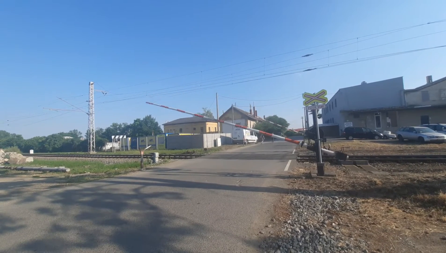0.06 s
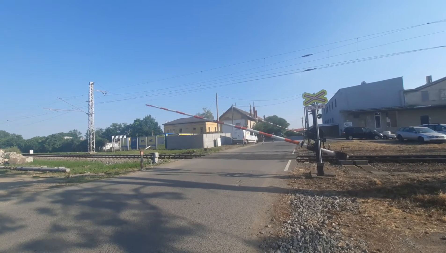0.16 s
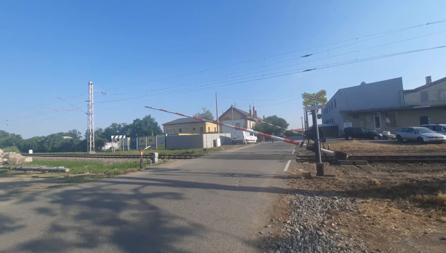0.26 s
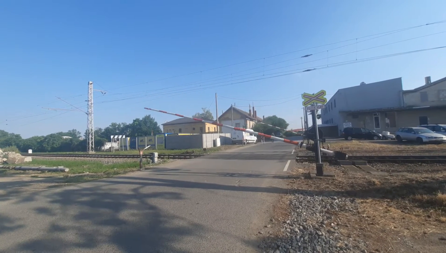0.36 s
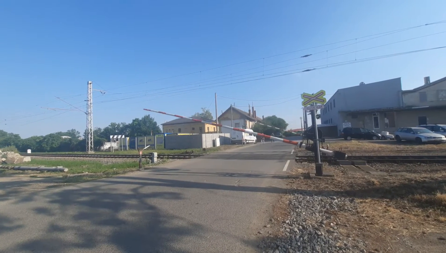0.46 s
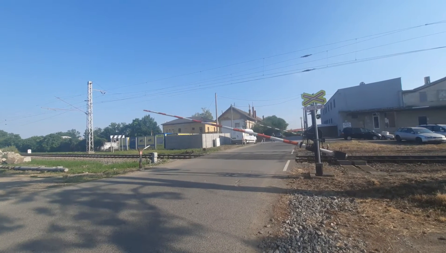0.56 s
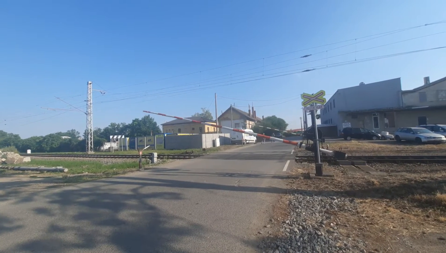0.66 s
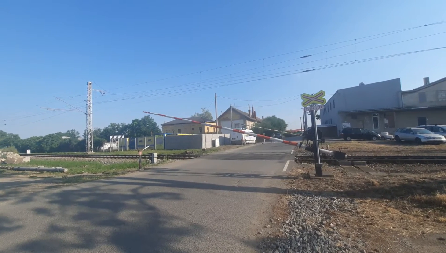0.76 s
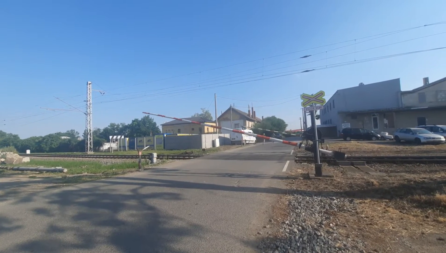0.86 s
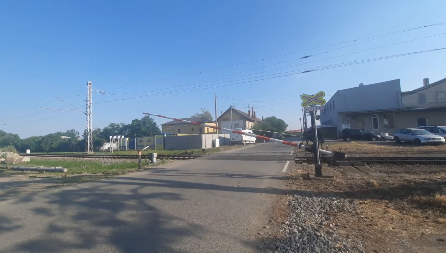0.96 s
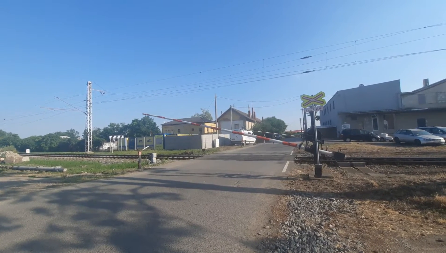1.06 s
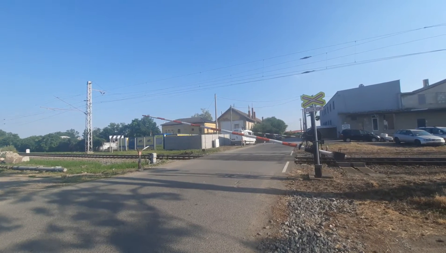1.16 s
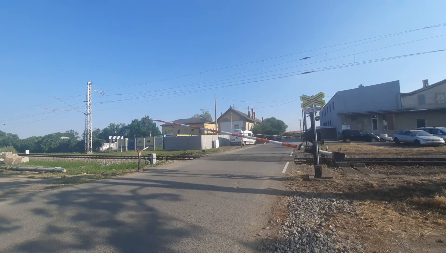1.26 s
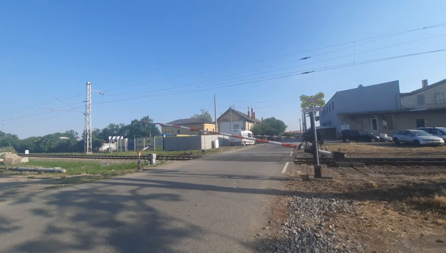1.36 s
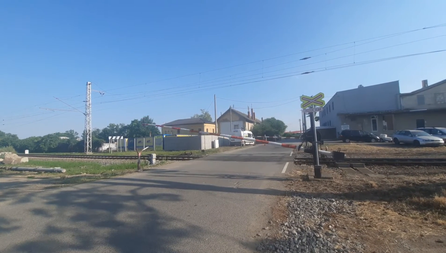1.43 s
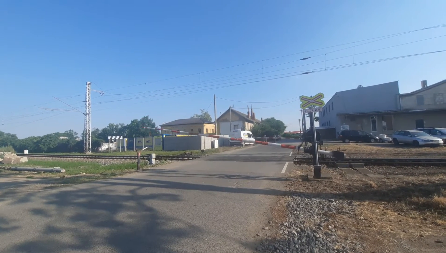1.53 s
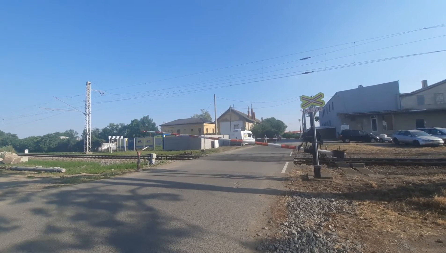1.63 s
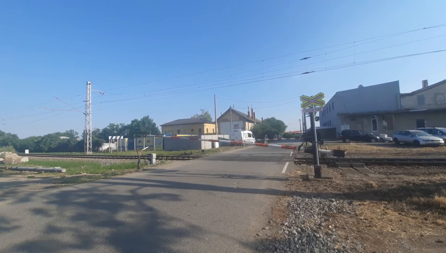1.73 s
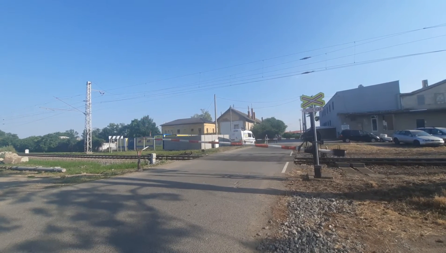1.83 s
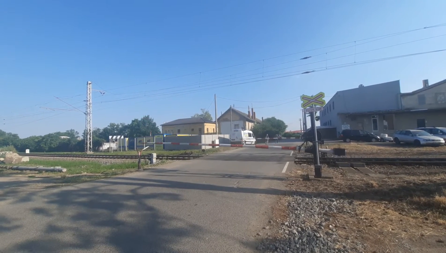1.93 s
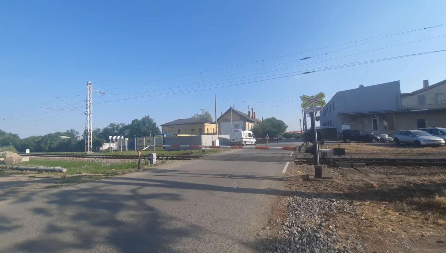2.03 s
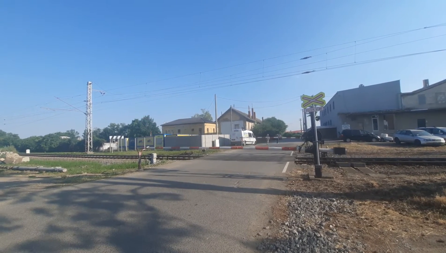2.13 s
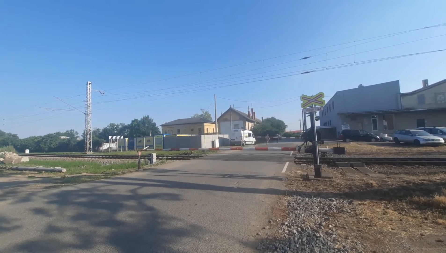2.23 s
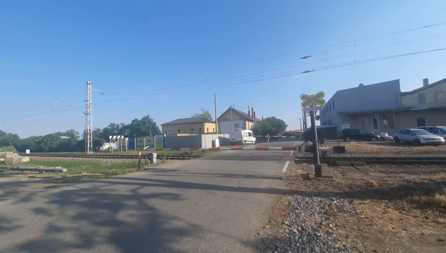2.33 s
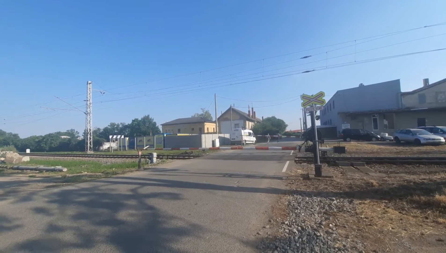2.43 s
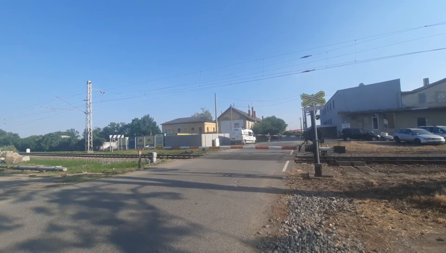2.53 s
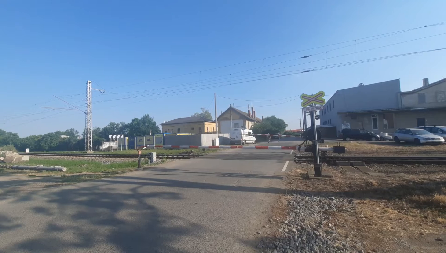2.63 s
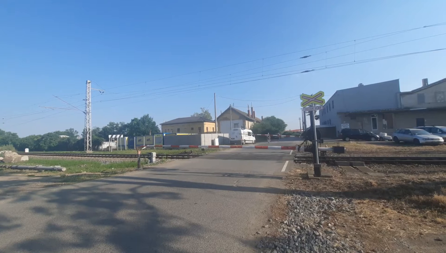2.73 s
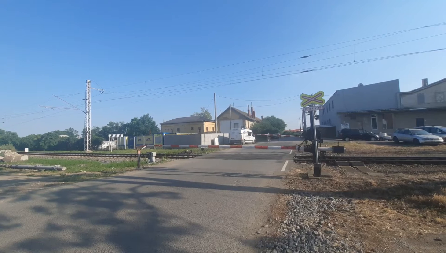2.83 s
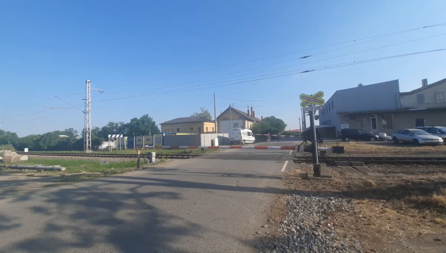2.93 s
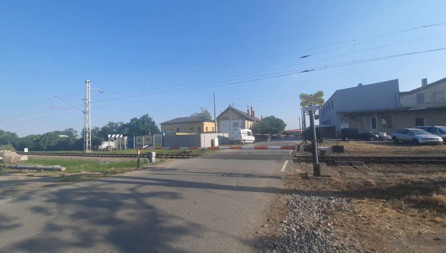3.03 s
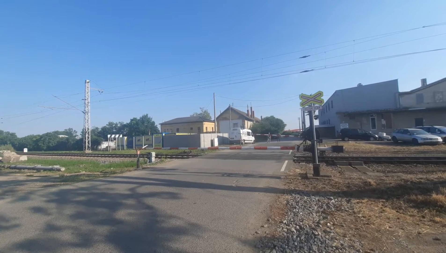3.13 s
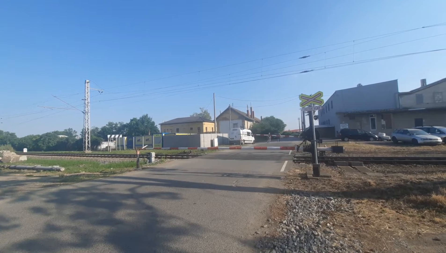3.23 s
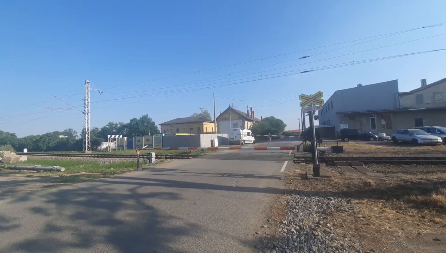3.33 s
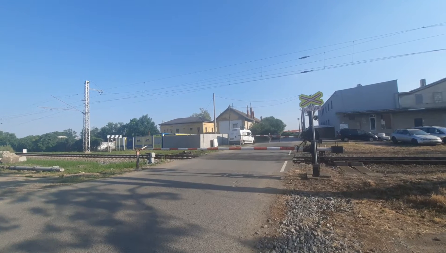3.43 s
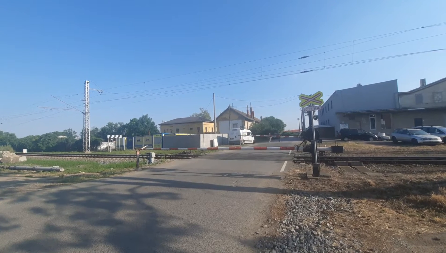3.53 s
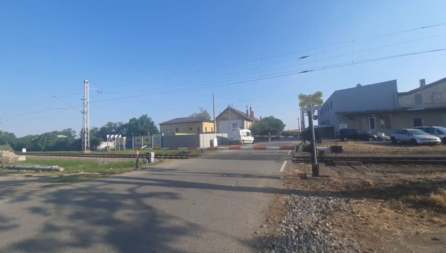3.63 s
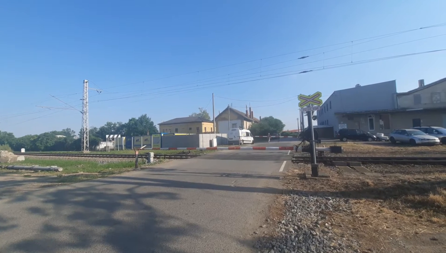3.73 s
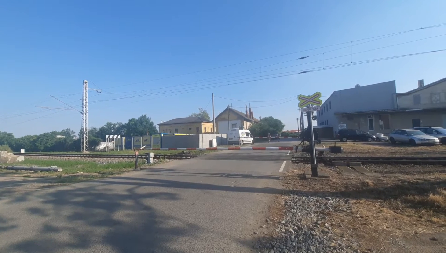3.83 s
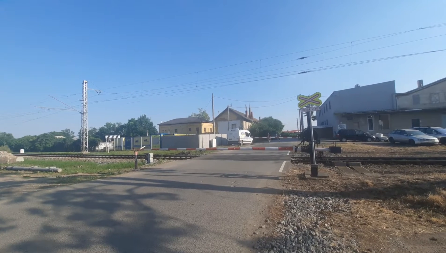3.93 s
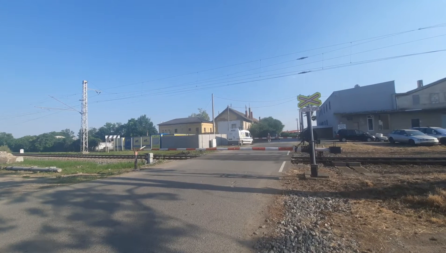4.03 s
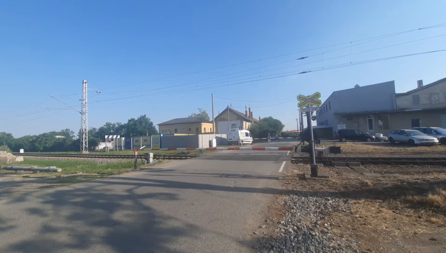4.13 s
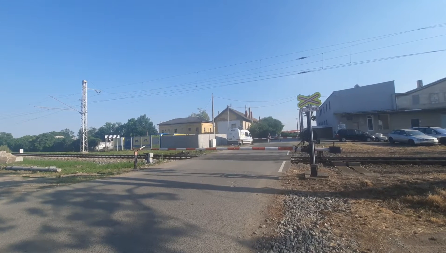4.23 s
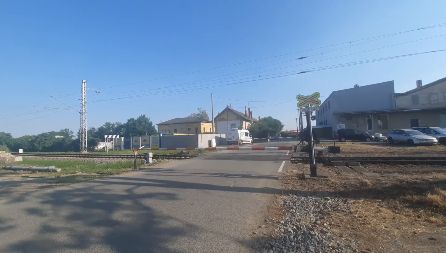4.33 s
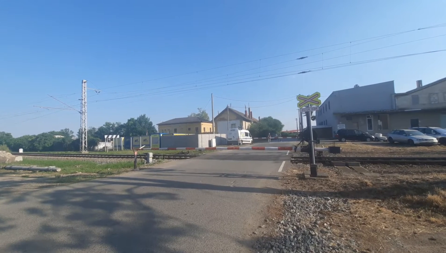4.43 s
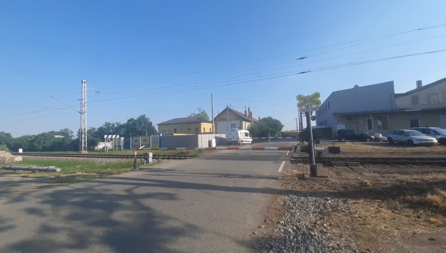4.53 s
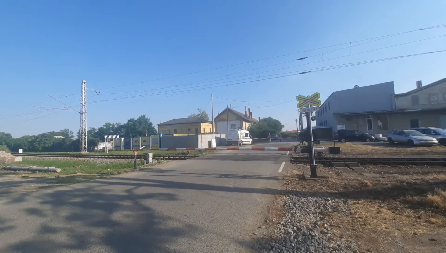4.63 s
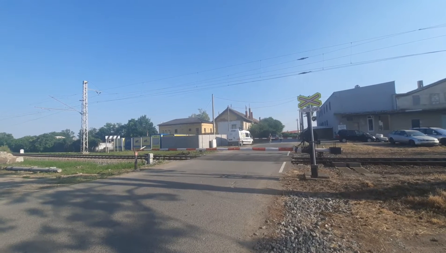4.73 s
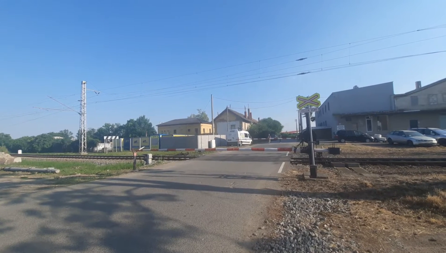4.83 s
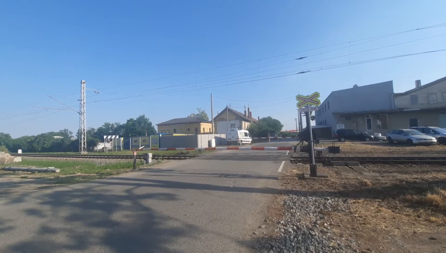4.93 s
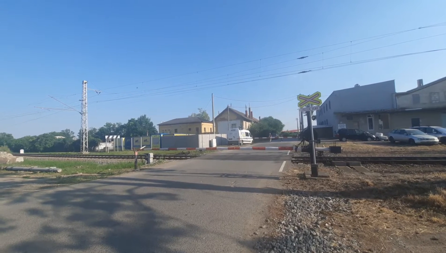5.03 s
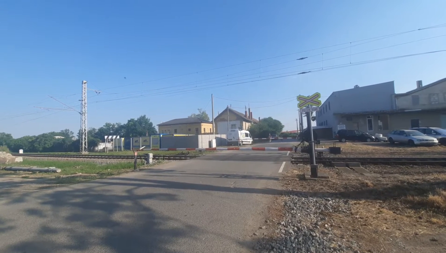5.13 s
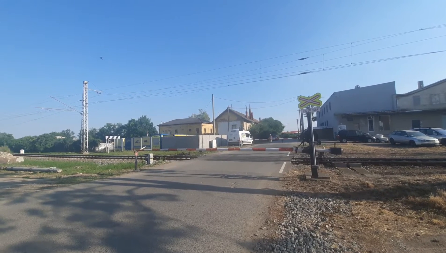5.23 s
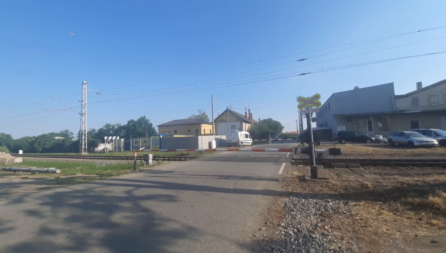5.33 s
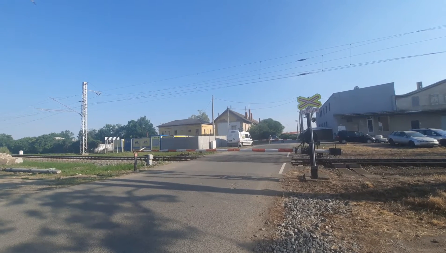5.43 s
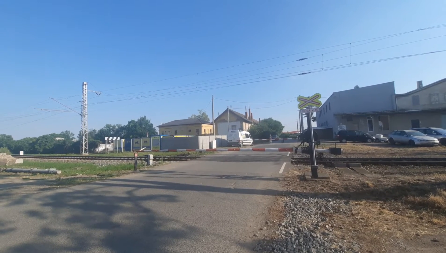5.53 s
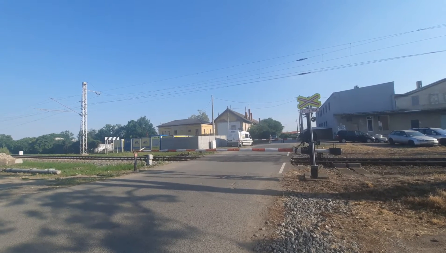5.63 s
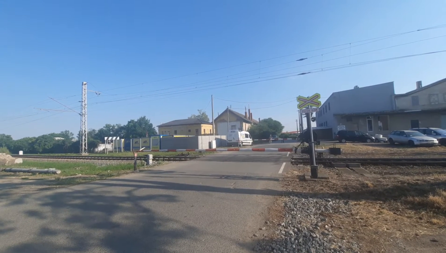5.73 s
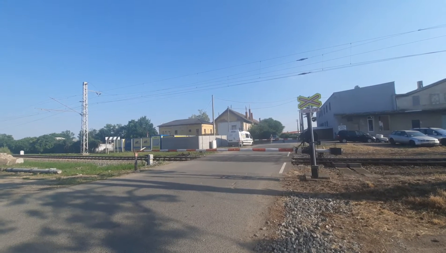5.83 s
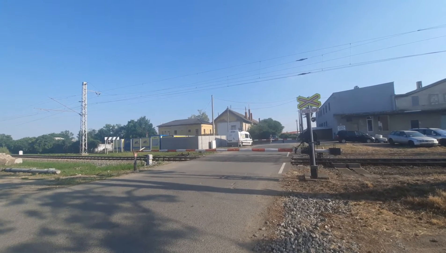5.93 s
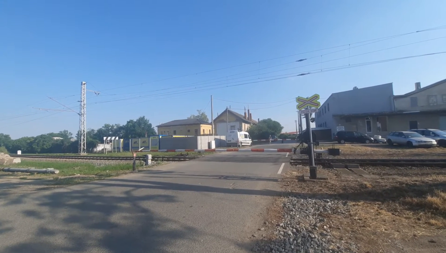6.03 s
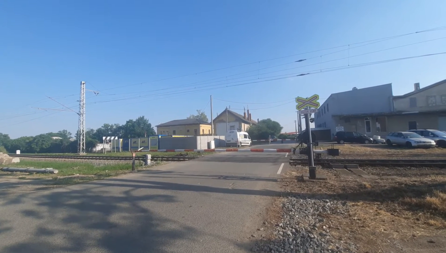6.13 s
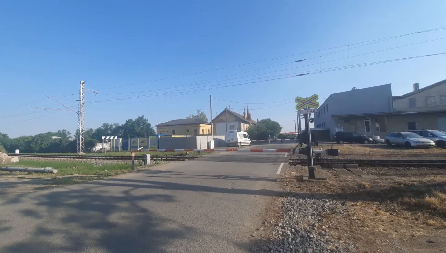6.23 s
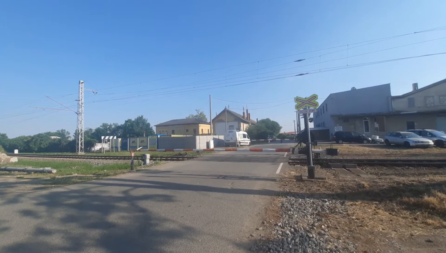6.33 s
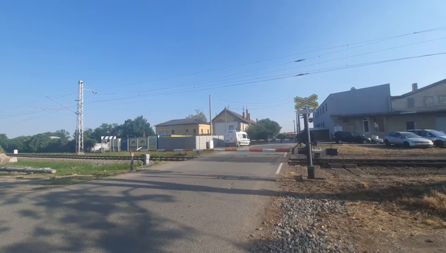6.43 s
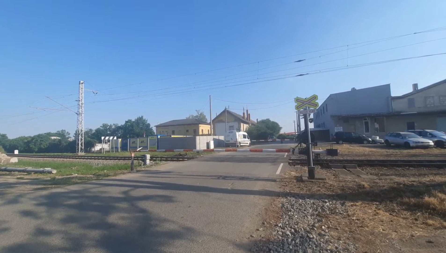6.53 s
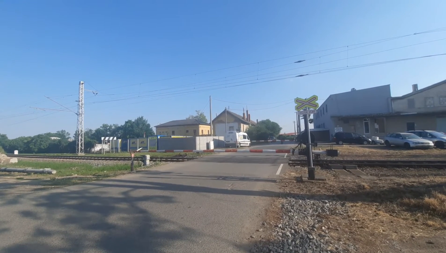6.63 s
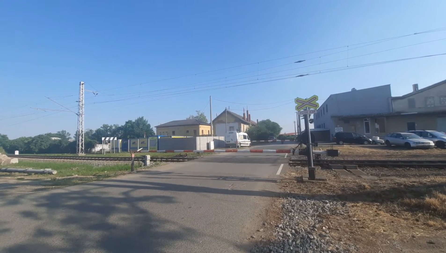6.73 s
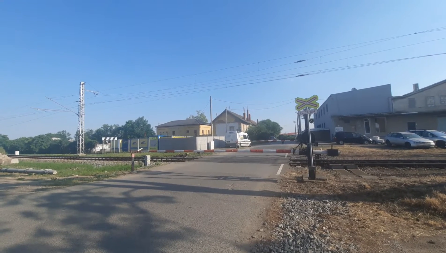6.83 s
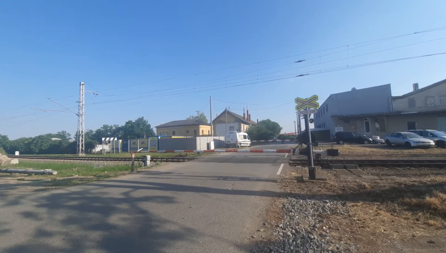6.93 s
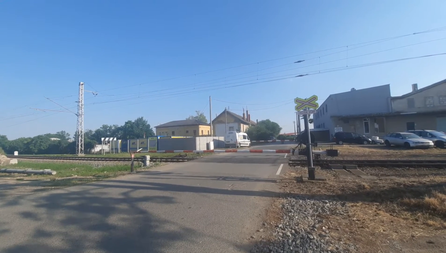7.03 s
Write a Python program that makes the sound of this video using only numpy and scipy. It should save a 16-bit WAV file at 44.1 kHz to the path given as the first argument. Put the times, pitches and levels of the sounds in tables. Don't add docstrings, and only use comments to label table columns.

```python
import sys
import numpy as np
from scipy import signal
from scipy.fft import rfft, irfft, next_fast_len
from scipy.io import wavfile
from scipy.ndimage import uniform_filter1d

SR = 44100
rng = np.random.default_rng(int(sys.argv[2]) if len(sys.argv) > 2 else 0)


def int16_out(signal):
    q = np.round(np.clip(np.atleast_2d(signal).T, -1, 1) * 32767)
    wavfile.write(sys.argv[1], SR, q.astype(np.int16))


def volts(x):
    e = np.asarray(x, float) / 20
    return 10 ** e


N = 312669

# time_s, load_db, looseness_db
GRIND = [(0.0, -37, -3.5), (0.26, -53, -5.5), (0.55, -50, -8), (1.22, -53, 10.5), (1.48, -46, 3),
         (1.8, -36, -5), (1.95, -35, 9), (2.47, -44, -3), (2.67, -61, 13), (2.88, -60.5, -3),
         (3.12, -52, 8), (3.43, -65, 4), (3.77, -64, 13), (4.01, -72, -2), (4.58, -68.5, 13.5),
         (5.31, -72.5, 5.5), (7.09, -89.5, 6.5)]
# start_s, strength_db, decay_s, panel_hz
JUDDERS = [(0.023, -31, 0.1, 730), (0.131, -34.5, 0.086, 633), (0.174, -35.5, 0.28, 822),
           (0.298, -37, 0.14, 656), (0.329, -36, 0.063, 624), (0.413, -35, 0.055, 837),
           (0.446, -30.5, 0.055, 600), (0.474, -42, 0.061, 700), (0.554, -29.5, 0.059, 618),
           (0.608, -32.5, 0.13, 760), (0.719, -33, 0.049, 627), (0.752, -34, 0.073, 700),
           (0.809, -46.5, 0.38, 700), (0.87, -31, 0.1, 899), (0.977, -30.5, 0.095, 620),
           (1.004, -32.5, 0.12, 886), (1.156, -26.5, 0.061, 867), (1.175, -27.5, 0.12, 600),
           (1.276, -26.5, 0.054, 600), (1.362, -25, 0.13, 874), (1.398, -34.5, 0.18, 745),
           (1.459, -26, 0.08, 591), (1.477, -29.5, 0.13, 913), (1.546, -31, 0.058, 1140),
           (1.56, -25.5, 0.084, 848), (1.619, -33, 0.24, 1100), (1.65, -31, 0.13, 600),
           (1.719, -30, 0.14, 626), (1.765, -31.5, 0.094, 1090)]
# start_s, strength_db, metal_share_db, decay_s, panel_hz
BOUNCES = [
    (1.883, -14, -27, 0.2, 749),
    (2.193, -29.5, -27, 0.17, 633),
    (2.336, -28, -32, 0.075, 612),
    (2.408, -8.5, -15.5, 0.074, 901),
    (2.452, -26, -32, 0.23, 874),
    (2.55, -13.5, -20, 0.077, 757),
    (2.569, -19, -34, 0.028, 864),
    (2.615, -29.5, -23, 0.064, 755),
    (2.683, -41, -7.5, 0.21, 872),
    (2.745, -39.5, -16, 0.12, 861),
]
# start_s, strength_db, metal_share_db, decay_s
SETTLING = [(2.861, -31, -25, 0.35), (2.896, -42.5, -3, 0.065), (3.008, -38.5, -5.5, 0.37),
            (3.098, -33.5, -15.5, 0.39), (3.161, -25, -7, 0.33), (3.219, -29, -19, 0.46),
            (3.357, -33, -11.5, 0.15), (3.495, -38.5, -12, 0.24), (3.552, -29.5, -16.5, 0.14),
            (3.631, -36, -13, 0.22), (3.703, -29.5, -17, 0.21), (3.748, -37.5, -5.5, 0.47),
            (3.833, -42, -10.5, 0.46), (3.888, -43.5, -10, 0.3), (4.014, -52.5, -13, 0.22),
            (4.11, -52.5, -10.5, 0.16), (4.203, -50, -19, 0.2), (4.272, -49, -17, 0.13),
            (4.321, -33, -20, 0.37), (4.387, -39, -8, 0.53), (4.454, -38, -23, 0.094),
            (4.648, -47, -10.5, 0.21), (4.881, -50, -23, 0.24), (5.214, -54, -25.5, 0.24),
            (5.604, -52.5, -25.5, 0.17), (5.998, -62, -25, 0.68), (6.039, -52.5, -9.5, 0.067),
            (6.069, -43.5, -30, 0.14), (6.111, -41.5, -22, 0.05)]
# pitch_hz, width_hz, level_db
PANEL_MODES = [(430.4, 17, 7), (600, 44, 3.5), (730, 150, -1.5), (874, 59, 2), (962, 47, -3.5),
               (1500, 60, -9), (1700, 15, -18.5)]
# freq_hz, gain_db
PANEL_WIDE = [(330, -26.5), (500, -6.5), (1000, -6), (1350, -8), (1800, -11), (2400, -48)]
# pitch_hz, width_hz, level_db
DOOR_MODES = [(160, 70, -13), (255, 45, -2), (298, 28, 8), (370, 60, -3)]
# freq_hz, gain_db
DOOR_WIDE = [(90, -23), (150, 6), (300, -3.5), (420, 3.5), (600, -55.5)]
# start_s, rattle_db, gear_share_db
TICKS = [(0.0993, -56.5, 4), (0.166, -63, 0), (0.779, -62, 11.5), (1.0214, -46.5, 6.5), (1.1974, -41, 0),
         (1.3022, -40.5, -1), (1.3844, -42.5, -9.5), (1.4007, -42, 4), (1.4239, -42, -2.5),
         (1.4959, -36.5, 1), (1.5926, -46.5, 1.5), (1.7412, -42.5, 5), (1.8303, -46, -13),
         (1.868, -48.5, -12), (1.8827, -30, -33), (1.9017, -42, -9.5), (2.2371, -52.5, -12),
         (2.3113, -50, -11.5), (2.4394, -43.5, -16.5), (2.479, -46, 1.5), (2.4994, -47, 5.5),
         (3.1994, -46, -16), (3.2882, -54, 5)]
# start_s, strength_db, decay_s, part_hz, rattle_share_db
LATCHES = [(1.884, -16, 0.027, 2456, -3), (4.3223, -38, 0.027, 2490, -4.5),
           (4.3396, -40.5, 0.12, 2380, -22), (4.352, -40.5, 0.16, 2820, -17),
           (4.377, -43.5, 0.1, 3030, -13), (4.4, -43, 0.3, 2490, -16), (4.447, -41, 0.038, 3140, -19),
           (4.4588, -42.5, 0.019, 2340, 0.5), (4.8773, -50, 0.08, 2090, -7.5),
           (4.898, -55.5, 0.13, 2360, -5), (4.489, -55.5, 1, 2630, -18), (5.998, -61.5, 0.34, 2195, -14),
           (6.0703, -37, 0.019, 2380, -7.5), (6.11, -42.5, 0.1, 2400, -14.5), (6.135, -59, 0.62, 2116, -9)]
# pitch_hz, width_hz, level_db
GEAR_MODES = [(2090, 86, -13), (2267, 110, 3), (2569, 55, 6.5), (2766, 22, 1), (2960, 17, -4),
              (3860, 600, -5)]
# freq_hz, gain_db
GEAR_WIDE = [(1000, -36), (1400, 7), (2000, 7), (2500, -4.5), (3200, -2), (3700, -5), (4200, -44.5)]
# freq_hz, gain_db
RATTLE = [(2180, -32), (3300, -6), (3870, -6), (4460, -15.5), (5170, -8), (6620, -12), (8400, -14),
          (9300, -35), (12500, -66.5), (21100, -120)]
# freq_hz, gain_db
FIZZ = [(5530, -47.5), (9400, -28.5), (10300, -15.5), (11300, 4), (13200, 0.5), (14300, -9), (15400, -9.5)]
# time_s, level_db, left_minus_right_db
GUSTS = [(0.0, -47, -14), (0.29, -51, 3), (0.93, -60, -4), (2.53, -56.5, -7), (2.8, -63.5, -1),
         (3.09, -44.5, 6.5), (3.47, -65, -11), (3.67, -62.5, -8), (3.73, -48.5, 20), (3.83, -66.5, -2),
         (4.85, -68.5, -3), (5.05, -61, -24), (5.25, -71, -14.5), (5.69, -63, -7.5), (5.79, -77, 3.5),
         (6.08, -56.5, -4), (6.69, -66.5, -6), (7.09, -54, -15.5)]
# freq_hz, gain_db
WIND = [(12, -43), (20, -19.5), (48, 3.5), (87, -2.5), (206, -16), (296, -19.5), (400, -28.5), (520, -63),
        (880, -120)]
# freq_hz, gain_db
AIR = [(88, -28.5), (150, -2.5), (286, -9.5), (534, -13.5), (745, -10), (3220, -29.5), (8230, -31.5),
       (9820, -33), (14800, -31.5), (16000, -46.5)]
# start_s, length_s, start_hz, end_hz, level_db
SQUEAKS = [(.162, .06, 2345, 2335, -54), (.227, .052, 2320, 2330, -57), (.283, .085, 2320, 2340, -63),
           (2.095, .06, 2740, 2740, -55), (2.205, .14, 2740, 2750, -57), (2.096, .014, 5650, 6150, -56),
           (2.221, .024, 1530, 1530, -38), (2.254, .032, 1530, 1520, -44), (4.364, .022, 2080, 2120, -56),
           (4.398, .022, 2430, 2430, -55), (4.436, .023, 1530, 1530, -46), (4.477, .042, 1510, 1510, -60),
           (6.11, .05, 1350, 1550, -64), (6.185, .025, 2560, 2450, -65), (6.352, .04, 2400, 2520, -84)]
# start_s, level_db, pitch_hz, t60_s
RINGS = [(.2, -46, 1290, 0.039), (0.317, -41, 1330, .08), (0.414, -51, 1280, 0.076), (.45, -42, 1350, .06),
         (0.561, -43, 1320, .06), (0.612, -38.5, 1340, 0.089), (.755, -45.5, 1310, .07),
         (0.874, -39.5, 1330, .06), (0.99, -38, 1340, 0.054), (1.887, -16, 3870, 0.022),
         (1.887, -18, 3110, .03), (1.889, -25, 4220, .03), (1.889, -38, 5080, .03), (1.888, -36, 138, 0.2),
         (2.413, -26.5, 897, 0.46), (2.413, -41, 144.4, 0.66), (2.45, -36, 759, 0.47),
         (2.552, -37, 912, 0.58), (2.556, -35, 393, 0.36), (3.2, -34, 372.7, 0.49), (3.5, -53, 2450, 0.056),
         (3.558, -33.5, 2810, 0.021), (3.577, -43, 372, 0.38), (3.631, -49, 2560, .08),
         (3.707, -55, 2770, .08), (3.75, -39, 372, 0.5), (3.828, -53, 2690, 0.13),
         (3.888, -56.5, 2785, 0.16), (4.25, -42.5, 95, 0.17), (4.33, -47.5, 792, 0.57),
         (4.35, -55, 5000, .06), (2.01, -47, 6260, .15), (2.235, -48, 4550, 0.036),
         (4.3226, -35.5, 2340, .05), (4.46, -42, 2340, 0.037), (4.65, -58, 772, 0.32),
         (4.66, -60, 1490, 0.11), (4.88, -63, 783, 0.38), (6.036, -49.5, 834, 0.17),
         (6.112, -36, 823, 0.057),
         (1.884, -17, 2500, .016), (1.884, -17.5, 710, .02), (1.8886, -18.5, 3320, .018),
         (1.887, -30.5, 5640, .02), (1.903, -36.5, 7100, .025), (1.938, -41, 3690, .04),
         (1.951, -40, 3690, .04), (2.0, -37, 2400, .06), (2.048, -41, 3030, .05), (2.068, -51, 5450, 0.046),
         (2.115, -53, 5740, .03), (2.126, -44, 3390, .04), (2.143, -44, 3300, .04), (2.16, -49, 4200, .03),
         (2.234, -50.5, 6750, .04), (2.24, -59, 6150, .1), (2.4091, -14.5, 875, .012),
         (6.0711, -32, 2290, .035), (6.072, -38.5, 2970, .025), (3.163, -31, 2700, 0.046),
         (6.071, -50, 5200, .025)]
# start_s, level_db, pitch_hz, t60_s
DRUMMING = [(0.624, -29.5, 301, .15), (0.756, -31, 297.5, 0.16), (1.003, -35, 291, .15),
            (1.474, -27, 294, .12), (1.768, -33, 295, .12), (1.895, -27.5, 293.7, .5),
            (1.975, -30.5, 300, .6), (2.059, -39.5, 293.2, .6), (2.167, -35.5, 298.5, .2),
            (2.198, -31, 298.4, .3), (2.338, -29.5, 299.3, .25)]
# start_s, level_db
SNAPS = [
    (1.8845, -42),
    (2.41, -55),
    (4.322, -68),
    (4.459, -65),
    (6.071, -41.5),
]
# freq_hz, gain_db
SNAP = [(6000, -28.5), (7500, -5.5), (9000, -10.5), (12000, -6), (15000, -0.5), (16500, 0.5)]
# start_s, length_s, start_hz, middle_hz, end_hz, level_db
WHISTLES = [
    (1.787, .04, 5250, 5250, 5240, -60),
    (2.603, .065, 5000, 5750, 5200, -72),
    (2.832, .125, 4800, 4900, 5020, -66.5),
    (4.09, .062, 3050, 3550, 4000, -80),
    (4.235, .05, 2750, 2620, 2520, -79),
    (4.247, .022, 3500, 3900, 4200, -79),
    (4.755, .05, 4620, 4600, 4580, -69),
    (5.557, .13, 4080, 3960, 4050, -77),
    (5.735, .052, 7600, 7150, 6200, -76),
]
# start_s, length_s,
# centre_hz, width_hz, level_db
CHIRPS = [(2.92, .33, 4900, 350, -79), (4.835, .06, 4400, 200, -75), (5.69, .1, 8300, 900, -81),
          (3.9, .1, 6800, 900, -80), (4.705, .12, 6050, 300, -80), (4.76, .39, 4350, 1300, -78),
          (4.97, .25, 4300, 500, -85), (5.09, .08, 4000, 900, -83), (5.21, .05, 3800, 600, -85),
          (5.325, .09, 4000, 500, -85), (5.1, .1, 1880, 150, -78), (5.69, .39, 7400, 1300, -74.5),
          (6.55, .25, 6800, 1200, -86), (6.69, .39, 1520, 420, -77), (6.455, .07, 1600, 150, -81),
          (5.47, .04, 2350, 500, -81), (5.502, .07, 2400, 900, -79), (5.55, .2, 2400, 1100, -82),
          (5.49, .39, 2760, 60, -88)]
# start_s, length_s, centre_hz, width_hz, level_db
SWELLS = [
    (2.946, 0.52, 5150, 3820, -66),
    (2.96, 0.42, 12000, 3000, -81),
    (6.201, 1.7, 271.5, 166, -67.5),
    (6.199, 1.44, 130, 77.9, -67.5),
]
# freq_hz, lead_rad
PORT = [(0, -2), (860, 1.18), (2330, -6), (2840, -5), (3620, -9), (4820, -14.5), (5170, -20.5),
        (7750, -20.5), (9220, -21.5), (10900, -46), (12100, -40), (14100, -58.5), (15500, -52),
        (16100, -58)]
# freq_hz, gain_db
LEFT = [(200, 1.5), (700, 2), (1500, 3), (2400, 2), (4000, 3), (8000, 3.5), (13000, -1.5)]
# freq_hz, t60_s
YARD = [(200, 0.55), (800, 0.24), (2500, .4), (6000, 0.1), (14000, 0.28)]
# freq_hz, gain_db
YARD_TILT = [(300, -8), (900, -1), (2000, -0.5), (5000, 4.5), (12000, 3)]
# freq_hz, gain_db
EDGE = [(8800, 0), (9900, -5), (11000, 0), (15300, 0), (15700, -16), (16300, -26)]


def evened(x):
    return x / np.sqrt(np.mean(x ** 2) + 1e-20)


def read(points, hz):
    f, value = np.transpose(points)
    return np.interp(np.log(hz + 1), np.log(f + 1), value)


def curve(table, column):
    table = np.array(table)
    return np.interp(np.arange(N) / SR, table[:, 0], table[:, column])


def colour(x, points):
    gain_db = read(points, abs(np.fft.fftfreq(4096, 1 / SR)))
    log_gain = np.log(volts(np.maximum(gain_db, -100)))
    taps = np.fft.ifft(np.exp(np.conj(signal.hilbert(log_gain)))).real[:2048]
    return signal.oaconvolve(x, taps if x.ndim == 1 else taps[None])[..., :N]


def resonate(x, hz, width_hz):
    r = np.exp(-np.pi * width_hz / SR)
    return 2 * signal.lfilter([1 - r], [1, -r * np.exp(2j * np.pi * hz / SR)], x).real


def unit(respond, force):
    return respond(force) / np.linalg.norm(respond(signal.unit_impulse(8192)))


def body(force, modes, wide, wide_db):
    def respond(x):
        rings = sum((-1) ** k * volts(db) * resonate(x, hz, w) for k, (hz, w, db) in enumerate(modes))
        return colour(rings + volts(wide_db) * x, wide)
    return unit(respond, force)


def wavering(count, depth_db):
    return volts(depth_db * evened(uniform_filter1d(rng.standard_normal(count), 350)))


def grit(grain_db):
    grain = np.minimum(rng.exponential(1, N), 6)
    return evened(rng.standard_normal(N) * volts(grain_db * grain))


def shaking(steady_db, times, dbs, t60s, rises, tick, bends=1):
    power = volts(steady_db) ** 2
    for s, db, t60, rise, bend in np.broadcast(times, dbs, t60s, rises, bends):
        t = np.arange(N - round(s * SR))[:SR // 2] / SR
        shudder = volts(-60 * (t / np.clip(t60, .02, 1)) ** bend) * (1 - np.exp(-t / rise))
        shudder = shudder + tick * 0.00062 / rise * np.exp(-t / 0.0036)
        power[round(s * SR):][:len(t)] += (volts(db) * shudder) ** 2
    return np.sqrt(power)


def struck(times, dbs, hzs, t60_s, rises):
    out, t = np.zeros(N), np.arange(SR // 8) / SR
    partners = rng.uniform(1.04, 1.12, len(times))
    for s, db, hz, partner, rise in np.broadcast(times, dbs, hzs, partners, rises):
        ring = np.sin(2 * np.pi * hz * t) + 0.54 * np.sin(2 * np.pi * hz * partner * t)
        part = out[round(s * SR):][:len(t)]
        part += (volts(db - 60 * t / t60_s) * (1 - np.exp(-t / rise)) * ring)[:len(part)]
    return out


def blows():
    s, db, t60, hz = np.transpose(JUDDERS)
    settling = np.c_[SETTLING, rng.uniform(687, 873, len(SETTLING))]
    hard_s, hard_db, _, hard_t60, hard_hz = np.r_[BOUNCES, settling].T
    door_db = hard_db - 14.5 + 30.5 * hard_t60
    return np.c_[[s, db, db - 2, t60, hz], [hard_s, hard_db, door_db, hard_t60, hard_hz]]


def housing():
    s, db, door_db, t60, hz = blows()
    soft = s < 1.85
    rise = np.where(soft, 0.0048, 0.0011)
    bend = np.where(soft, 2.3, 1.05)
    db, door_db = db + 2.0 * soft, door_db + 4.7 * soft
    load_db, contact = curve(GRIND, 1), grit(2.3)
    panels = shaking(load_db - 1.5, s, db - 9.0, t60, rise, tick=0.48, bends=bend) * contact
    door = shaking(load_db + 0.5, s, door_db - 7.0, t60 * 0.73, rise, tick=.6, bends=bend) * contact
    rings = struck(s, db - 7.0, hz, 0.11, rise / 2)
    rings = rings + struck(s, door_db + .5, DOOR_MODES[2][0], 0.047, rise)
    return body(panels, PANEL_MODES, PANEL_WIDE, -14.0) + body(door, DOOR_MODES, DOOR_WIDE, -25.5) + rings


def clacks():
    lag_s, metal_hz = 0.0038, (2260, 2910)
    rows = [(s, db - 20.5, db - 38.5, 0.27, 2220) for s, db, *_ in JUDDERS]
    rows += [(s + lag_s, db + share, db + share - 12, 0.068, rng.uniform(*metal_hz))
             for s, db, share, *_ in BOUNCES + SETTLING]
    rows += [(s, db + share, db, 0.061, rng.uniform(*metal_hz)) for s, db, share in TICKS]
    rows += [(s, db, db + share, t60, hz) for s, db, t60, hz, share in LATCHES]
    return np.transpose(rows)


def jingle(per_s, low_hz, high_hz, count=14):
    out, u = np.zeros(N), np.linspace(0, 1, 600)
    pitches = np.geomspace(low_hz, high_hz, count)
    for hz, (glide, speed) in zip(pitches, rng.uniform(-1, 1, (count, 2))):
        phase = 2 * np.pi * hz * np.cumsum(1 + .03 * glide * u) / SR
        ping = np.sin(phase) * u ** .2 * np.exp(-(9 + 3 * speed) * u)
        chance = rng.random(N) * count * SR / per_s
        out += signal.oaconvolve((chance < 1) * np.maximum(chance, .05) ** -.45, ping)[:N]
    return evened(out)


def clatter():
    s, db, rattle_db, t60, hz = clacks()
    load_db, loose_db = curve(GRIND, 1), curve(GRIND, 2)
    gears_db = load_db - 11.5 + 0.71 * loose_db
    loose_db = load_db - 23 + loose_db
    contact = grit(4.8)
    teeth = shaking(gears_db - 5.5, s, db - 5.5, t60, 0.00048, 0.83) * contact
    out = body(teeth, GEAR_MODES, GEAR_WIDE, -5.5) + struck(s, db + 0.5, hz, 0.026, 0.0013)
    rod_free = np.arange(N) < 4.4 * SR
    rod = volts(.7 * load_db - 35) * wavering(N, 5) * contact * rod_free
    out = out + unit(lambda x: resonate(x, 2765, 70), volts(-14) * teeth + rod)
    out = out + volts(gears_db - 7.5) * jingle(440, 920, 3800)
    out = out + volts(loose_db - 5.0) * jingle(430, 4200, 8000)
    for spectrum, steady_db, gain_db, shorter in ((RATTLE, -3.5, -.1, .8), (FIZZ, -18, -17, .55)):
        force = volts(gain_db) * shaking(loose_db + steady_db, s, rattle_db, t60 * shorter, 0.0013, 0.76)
        out = out + unit(lambda x: colour(x, spectrum), force * contact)
    return out


def wind():
    lumps = volts(3.5 * evened(uniform_filter1d(rng.standard_normal((2, N)), 2000)))
    puffs = colour(rng.standard_normal((2, N)) * lumps, WIND)
    puffs = evened(puffs + colour(puffs[::-1], [(50, -17.5), (90, -0.5), (150, -6.0)]))
    return puffs * volts(curve(GUSTS, 1) + 7.0 + np.outer([.5, -.5], curve(GUSTS, 2)))


def air():
    hiss = colour(rng.standard_normal((2, N)), AIR)
    return volts(-73.0) * evened(hiss + 0.12 * hiss[::-1])


def squeaks():
    out, edge_s = np.zeros(N), .005
    for s, length, hz, end_hz, db in SQUEAKS:
        t = np.arange(0, length, 1 / SR)
        edges = np.clip(np.minimum(t, length - t) / edge_s, 0, 1)
        pitch = hz + (end_hz - hz) * t / length
        swing = wavering(SR // 2, 2.5)[:len(t)]
        tone = edges * swing * np.sin(2 * np.pi * np.cumsum(pitch) / SR)
        out[round(s * SR):][:len(t)] += volts(db + 7.5 - 6 * t / length) * tone
    return out


def ringing_parts():
    out, t = np.zeros(N), np.arange(SR // 2) / SR
    for s, db, hz, t60 in RINGS + DRUMMING:
        ring = np.sin(2 * np.pi * hz * t) * (1 - np.exp(-t * hz / 1.1)) * wavering(len(t), 2.5)
        out[round(s * SR):][:len(t)] += volts(db - 60 * t / t60) * ring
    return out


def snaps():
    force, t = np.zeros(N), np.arange(SR // 2) / SR
    for s, db in SNAPS:
        force[round(s * SR):][:len(t)] += volts(db - 60 * t / 0.018)
    return unit(lambda x: colour(x, SNAP), force * rng.standard_normal(N))


def whistles():
    out = np.zeros(N)
    for s, length, *hz, db in WHISTLES:
        u = np.arange(0, 1, 1 / (length * SR))
        pitch = np.polyval(np.polyfit([0, .5, 1], hz, 2), u)
        waver = volts(1.8 * evened(uniform_filter1d(rng.standard_normal(len(u)), 300)))
        tone = waver * np.sin(2 * np.pi * np.cumsum(pitch) / SR) * u ** .4 * (1 - u) ** .75
        out[round(s * SR):][:len(u)] += volts(db + 1.5) * evened(tone)
    return out


def chirps_and_swells():
    out = np.zeros(N)
    for s, length, hz, width, db in CHIRPS + SWELLS:
        onset, fade = (1, 2) if length > .4 else (.7, 3.5)
        u = np.arange(0, 1, 1 / (length * SR))
        hoarse = rng.standard_normal(len(u))
        for _ in range(3):
            hoarse = resonate(hoarse, hz, width)
        part = out[round(s * SR):][:len(u)]
        part += volts(db) * evened(hoarse * u ** onset * (1 - u) ** fade)[:len(part)]
    return out


def ports(x, left_db):
    size = next_fast_len(N + 4096)
    hz = np.fft.rfftfreq(size, 1 / SR)
    turn = np.exp(1j * np.interp(hz, *np.transpose(PORT))) * volts(read(LEFT, hz))
    left = irfft(rfft(np.pad(x, (0, 2048), "reflect"), size) * turn, size)[:N]
    return np.array([volts(left_db) * left, x])


def yard(x):
    taps = np.zeros((2, SR // 2))
    at = np.arange(100, SR // 2 - 20, 20) + rng.integers(0, 20, (2, (SR // 2 - 101) // 20))
    np.put_along_axis(taps, at, rng.choice([-1., 1.], at.shape), 1)
    hz, t, z = signal.stft(taps, SR, nperseg=256)
    tail = signal.istft(z * volts(-60 * t / read(YARD, hz)[:, None]), SR, nperseg=256)[1]
    shared = colour(tail[::-1], [(200, 1.0), (500, 1.5), (1200, -22.5)])
    tail = tail + shared[:, :tail.shape[1]]
    return signal.fftconvolve(x[None], tail / np.linalg.norm(tail[0]), axes=1)[:, :N]


def scene():
    drive = housing() + clatter()
    blown, hum = wind(), air()
    small = squeaks() + ringing_parts() + snaps()
    song = whistles() + chirps_and_swells()
    near = volts(-2.5) * ports(drive + small, 0.1)
    near_tail = volts(-6.5) * yard(colour(drive + .4 * small, YARD_TILT))
    far = ports(song, 1.5) + volts(-9) * yard(song)
    return near + near_tail + far + blown + hum


def low_pass(x):
    return signal.sosfilt(signal.butter(12, 16520, fs=SR, output="sos"), x)


def record(dry):
    no_bass = signal.sosfilt(signal.butter(2, 42, "high", fs=SR, output="sos"), dry)
    rounded = .6 * np.tanh(colour(no_bass, EDGE) / .6)
    closing = np.minimum((N - np.arange(N)) / (.004 * SR), 1)
    return low_pass(rounded * closing)


dry = scene()
out = record(dry)
int16_out(out)
```